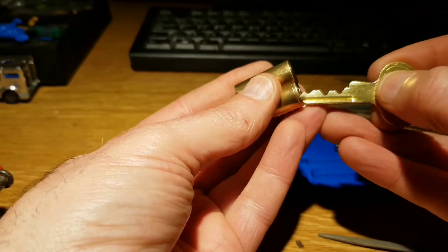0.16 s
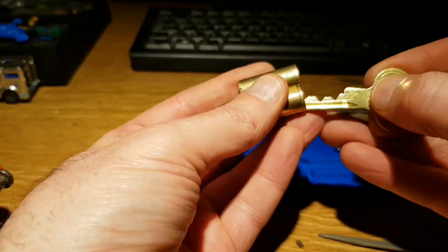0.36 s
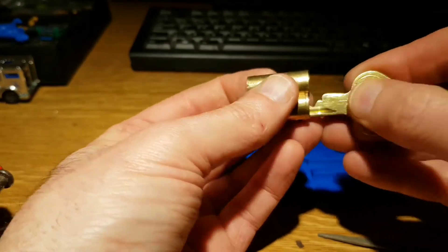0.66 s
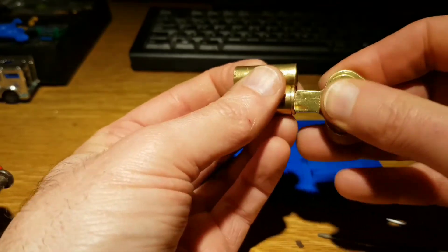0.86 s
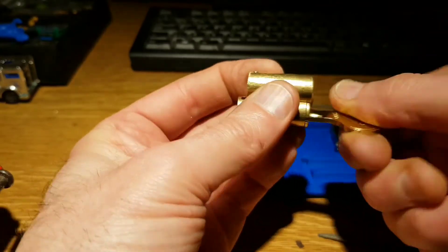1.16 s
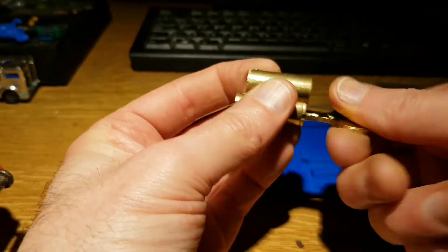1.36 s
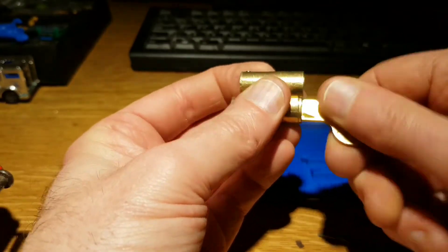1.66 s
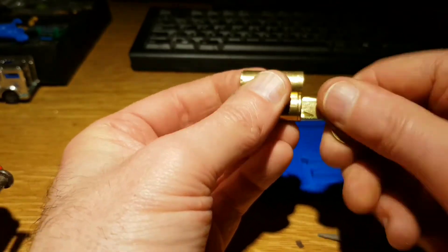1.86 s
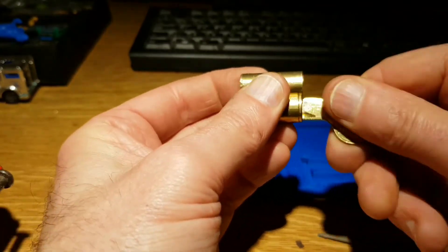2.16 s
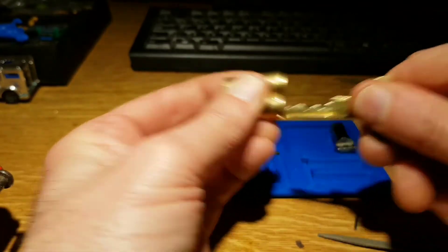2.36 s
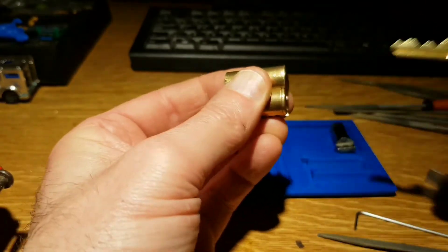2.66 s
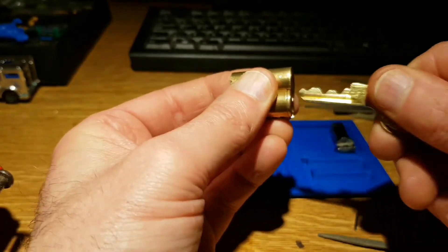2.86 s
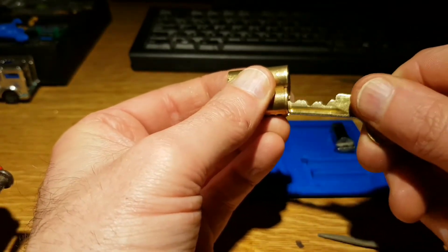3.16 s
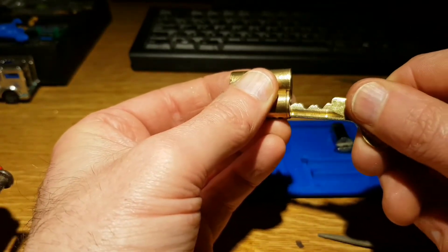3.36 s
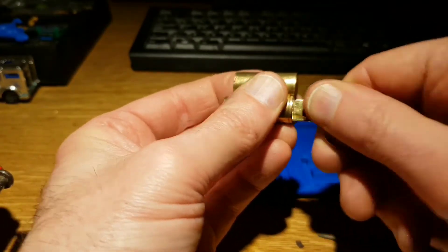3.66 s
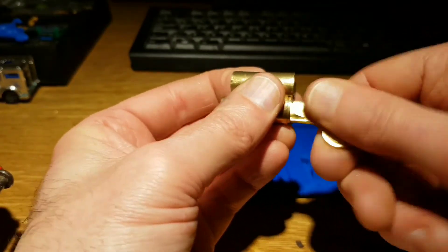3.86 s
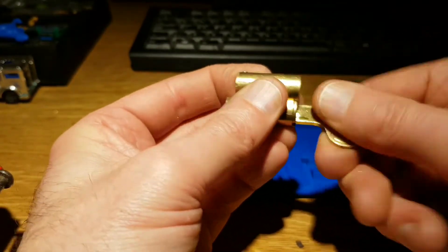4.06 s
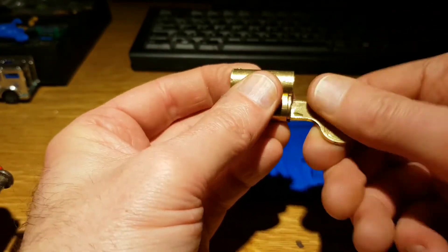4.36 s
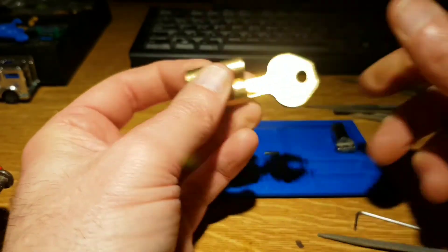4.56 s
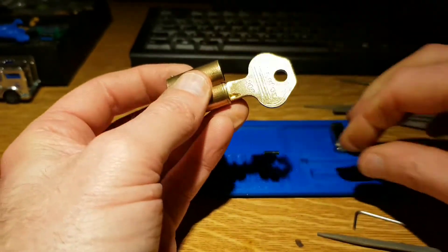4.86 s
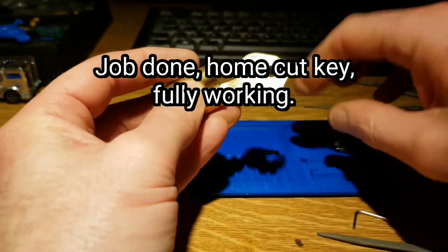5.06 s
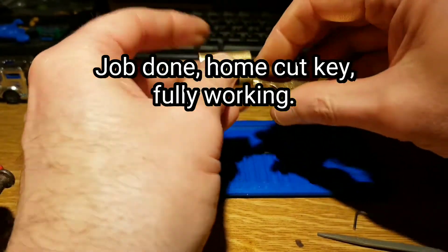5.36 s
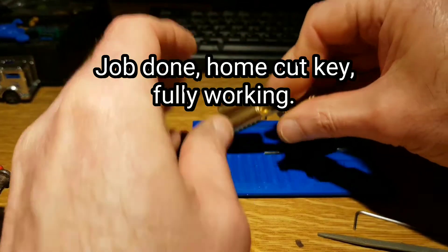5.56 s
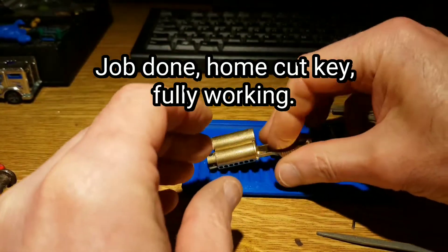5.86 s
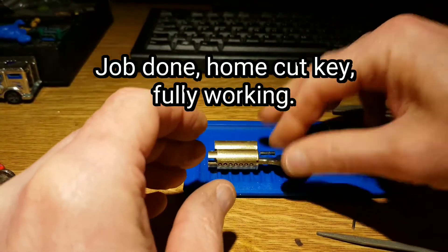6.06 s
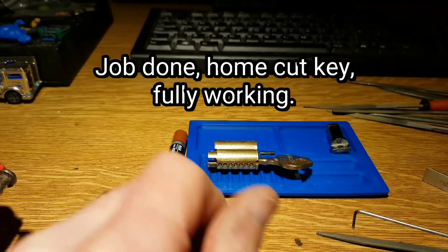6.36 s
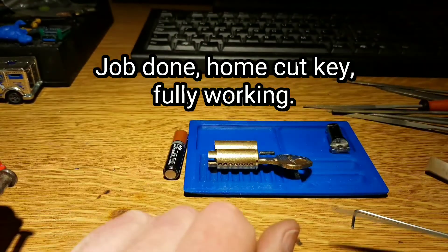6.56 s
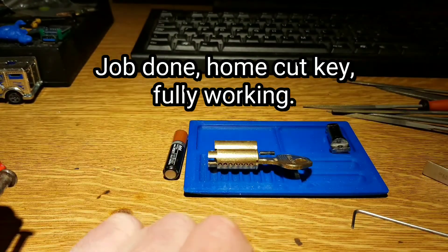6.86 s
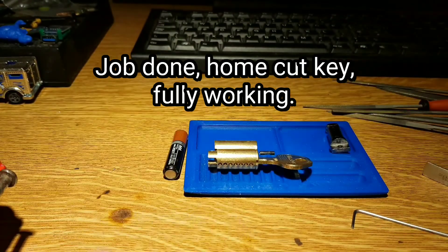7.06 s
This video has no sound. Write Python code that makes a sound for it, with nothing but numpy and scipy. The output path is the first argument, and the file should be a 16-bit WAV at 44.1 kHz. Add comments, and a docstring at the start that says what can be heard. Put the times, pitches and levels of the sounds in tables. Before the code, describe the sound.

Close stereo pickup in a small dry room: a brass key slides into a hand-held lock cylinder with bright snapping clicks and a hard stop. Light ticks follow as it turns, then a rapid clatter as it is pulled out. It goes in and turns again. The lock clacks onto a plastic tray, and metal tools knock and ring briefly on the wooden desk. A soft low hum and faint hiss sit beneath.

```python
"""In a small dry room, heard close by in stereo, a brass key goes into a hand-held lock cylinder, turns,
comes out, goes in and turns again. Sprung pins snap over its cuts: shaped noise bursts that ring brass modes.
The lock is then set on a plastic tray and metal tools clatter on the wooden desk: band-limited bursts over
ringing tool, panel and desk modes. Behind them lie a swelling low hum, the rumble of moving hands, hiss
and faint thin whistles; banded noise tails make the reflections."""
import sys
import numpy as np
from scipy import signal
from scipy.fft import rfft, irfft
from scipy.io import wavfile
from scipy.ndimage import uniform_filter1d

SR = 44100
rng = np.random.default_rng(int(sys.argv[2]) if len(sys.argv) > 2 else 0)


def transcribe(signal):
    """Save signal, clipped to [-1, 1], as a 16-bit WAV file at the path in sys.argv[1]."""
    frames = np.atleast_2d(signal).T
    limited = np.clip(frames, -1, 1)
    pcm = np.round(limited * 32767).astype(np.int16)
    wavfile.write(sys.argv[1], SR, pcm)


N = 317520
T = np.arange(N) / SR  # [s]

# sharp clicks as pins snap over the cuts of the sliding key, and one as the lock lands:
# (time [s], energy [dB], decay [ms], body against snap [dB])
PIN_CLICKS = [ (0.6591, -11.5, 2.2, -32), (0.7585, -9.5, 3.1, -27.5), (0.769, -1, 1.8, -23.5),
              (2.424, -22.5, 5.4, -5.5), (2.429, -15, 1.6, -5), (2.437, -8.5, 6.6, -3.5),
              (2.464, -15, .9, -1), (2.475, -7, 11, -11), (2.4828, -3, 1.6, -26.5), (2.489, -7.5, 2.5, -14),
              (3.6327, -14, 3.3, -14), (3.652, -9.5, 4.5, -22.5), (3.6702, -1, 1.4, -17.5),
              (6.081, -14.5, 6.2, -2.5)]
# the key's shoulder hits the face of the cylinder: (time [s], energy [dB], body against snap [dB])
SHOULDER_STOPS = [(0.8844, 7.5, -16), (3.7737, 8.5, -10.5)]
# light ticks as the key is aimed, turned and let go, and as loose metal settles:
# (time [s], energy [dB], decay [ms], body against snap [dB])
LIGHT_TICKS = [ (.314, -39, 2, -4.5), (0.4196, -29, .7, -11), (0.4708, -24.5, 0.68, -12),
               (1.206, -26, 5.4, -5), (1.4805, -24, 1.4, -25), (1.581, -24.5, 2.5, -4),
               (1.778, -33, 1.3, 2.5), (1.802, -29, 1.7, -1), (1.915, -23, 0.49, -12),
               (1.9896, -19, 2.1, -9.5), (3.171, -49, 2.6, 5), (3.2532, -39.5, 2.1, 1.5),
               (3.308, -34.5, 1.8, -8), (3.3373, -37.5, 1.6, -6), (3.9829, -23.5, 1.43, -5),
               (4.155, -26, 1.05, -11.5), (4.2146, -25.5, 5.6, 0), (4.397, -30.5, 1.07, -2),
               (4.49, -30, 2.8, -4), (4.5962, -23, .7, -11), (4.678, -22, 4.1, -9.5),
               (5.064, -36.5, 1.8, -16), (5.121, -34.5, 3.5, -17), (5.3887, -38.5, .7, -16),
               (5.4565, -36.5, 0.54, -2.5), (5.555, -23, 2.9, -8.5), (5.885, -24, 0.94, 4.5),
               (6.047, -36.5, 2.6, 4), (6.0717, -20, 1, 2.5), (6.16, -17.5, 4, -10), (7.104, -14, 1.1, 2),
               (7.1655, -14.5, 2.6, 2)]
# spans in which ticks ring the key: (start [s], end [s])
KEY_RINGS = [(1.4, 1.6), (4.1, 4.2)]
# spectrum of the bright snap: (frequency [Hz], density [dB per Hz])
SNAP_SPECTRUM = [(200, -49), (1700, -33), (2600, -11.5), (4500, -14), (7500, -9.5), (10000, -2.5),
                 (13700, -2.5), (15400, -1), (17500, -22.5)]
# spectrum of the fuller body under the snap: (frequency [Hz], density [dB per Hz])
BODY_SPECTRUM = [(60, -14), (250, -16), (700, 6), (1100, -6), (2100, 1), (4000, 0), (8000, -1),
                 (15000, -7.5), (18000, -33)]
# modes of the hand-damped brass: (frequency [Hz], energy [dB], t60 [s])
BRASS_MODES = [(2530, -5.5, 0.016), (5520, -8.5, 0.017), (6150, -9, 0.024), (9560, -6, 0.0058),
               (11500, -1.5, 0.027), (13100, -4.5, 0.004), (15800, 0.5, 0.0027), (13900, 0.5, 0.0095)]
# modes of the key: (frequency [Hz], energy [dB], t60 [s])
KEY_MODES = [(4220, 17.5, 0.0082), (5660, -25, 0.035), (9500, 1, 0.016)]
# the fingers shift their grip, the hand meets the desk: (time [s], energy [dB])
GRIP_JOLTS = [(3.685, -17), (4.597, -21), (4.625, -18.5), (5.158, -26), (5.58, -20.5), (5.908, -7.5),
              (6.138, -11)]
# spectrum of a dull push: (frequency [Hz], density [dB per Hz])
JOLT_SPECTRUM = [(30, -12.5), (100, 8), (190, -1.5), (350, -14.5), (800, -23), (2000, -54.5), (8000, -75)]
# the key's tip scrapes at the mouth of the keyway: (time [s], length [s], level [dB])
KEYWAY_SCRAPES = [(3.118, 0.062, -66.5), (3.247, 0.051, -63)]
# modes of the mouth of the keyway: (frequency [Hz], energy [dB], t60 [s])
KEYWAY_MODES = [(2270, -2, .011), (3380, -27, 0.0098)]
# the hand lays the lock on the plastic tray:
# (time [s], energy [dB], decay [ms], lowest frequency [Hz], highest frequency [Hz])
TRAY_LANDING = [(5.886, -9.5, 24, 170, 1140), (6.070, -4, 11, 540, 925), (6.083, 11.5, 4.1, 524, 7960),
                (6.112, -3.5, 12, 460, 1814), (6.163, -10.5, 4.6, 140, 890)]
# loose metal tools knock on the desk:
# (time [s], energy [dB], decay [ms], lowest frequency [Hz], highest frequency [Hz])
TOOL_KNOCKS = [(6.619, -3, 4.7, 669, 1465), (6.6371, 2.5, 2.9, 1800, 6640), (6.666, -2.5, 6.8, 854, 2760),
               (7.006, -10, 10.7, 892, 2600), (7.018, -9, 13, 900, 1890), (7.0588, 1.5, 3.7, 970, 6540),
               (7.1065, 1, 2.9, 580, 1940), (7.128, -6, 2.3, 586, 1580), (7.167, -4.5, 3.2, 710, 2680)]
# spectrum of the clack on tray and desk: (frequency [Hz], density [dB per Hz])
CLACK_SPECTRUM = [(60, -35.5), (300, -9), (560, -0.5), (800, -1), (980, -6), (1300, -5), (1850, -9),
                  (2600, -10.5), (4500, -14), (7500, -21), (15000, -9)]
# modes of the metal that lands: (frequency [Hz], energy [dB], t60 [s])
TOOL_MODES = [(1006, 6, 0.17), (1100, 0, .14), (1280, -8, 0.12), (1490, 1.5, .16), (1680, 1.5, 0.13),
              (2010, -16, 0.037), (2480, -11.5, 0.1), (2610, -13, .08), (3390, -12, 0.037),
              (3190, -15.5, .08), (4250, -3, .06), (7050, -8, .1), (10400, -6.5, .08), (12520, -10.5, .1)]
# modes of a light panel on the desk: (frequency [Hz], energy [dB], t60 [s])
PANEL_MODES = [(463.3, -2, 0.17), (495, -5, 0.059), (588, -7.5, 0.16), (639, -6.5, 0.41), (773, -5, .12),
               (831.4, -3, 0.29)]
# modes of the wooden desk top: (frequency [Hz], energy [dB], t60 [s])
DESK_MODES = [(138.3, 3.5, 0.72), (206, -14.5, .12), (231.6, -2.5, 0.27), (330.3, -1, .45),
              (388, -1.5, 0.073)]
# colour of the reflections: (frequency [Hz], level [dB])
ROOM_COLOUR = [(80, 4.5), (400, 0), (1500, -0.5), (4000, 1.5), (8000, -1), (15000, -5)]
# decay of the reflections: (frequency [Hz], t60 [s])
ROOM_DECAY = [(100, 0.55), (400, .38), (1800, 0.37), (5000, 0.28), (13000, 0.2)]
# rumble of the moving hands: (frequency [Hz], density [dB per Hz])
HANDS_SPECTRUM = [(20, -9), (45, -3.5), (105, -3), (160, -10.5), (270, -16.5), (420, -28.5), (2000, -59.0)]
# steady noise floor: (frequency [Hz], density [dB per Hz])
FLOOR_SPECTRUM = [(15, -34.5), (25, -9), (71, 2.5), (91, 0), (177, -17.5), (265, -16), (357, -33),
                  (578, -37), (1880, -39), (3690, -51), (6480, -51), (7610, -60), (8480, -50),
                  (11100, -43.5), (15300, -42)]
# faint thin whistles that rise and fall: (middle [s], length [s], top pitch [Hz])
THIN_WHISTLES = [(.1, .3, 9100), (2.73, .1, 10800), (2.83, .12, 11200), (2.96, .24, 11100),
                 (5.53, .3, 11800)]

LEAD_S = 0.004  # a burst starts this long before its blow
CLICK_ROOM_DB, STOP_ROOM_DB, TICK_ROOM_DB = -9.5, -7, -3.5  # room send against the direct sound
STOP_DECAY_MS = 1
# the last pins lift just before each stop
RUN_IN_S, RUN_IN_DB, RUN_IN_DECAY_MS, RUN_IN_BODY_DB = 0.0082, -13, 4, -14.5
# a drawn-out tick has a fainter one just before; ticks no longer than CRISP_MS come without
FORE_TICK_S, FORE_TICK_DB, CRISP_MS = 0.0065, -11, 1.1
# small metal parts rattle faintly within this time after a tick
RATTLE_S, RATTLE_DB, RATTLE_DECAY_MS = 0.033, -12.5, 1.1
CLICK_JOLT_DB, STOP_JOLT_DB = 5, -19  # push in the fingers, against a click's body and against a stop
SLIPS_PER_S, SCRAPE_EDGE_S, SCRAPE_ROOM_DB = 630, 0.0093, -1.5
LANDING_METAL_DB, LANDING_ROOM_DB = -16, -7  # the fingers damp the metal
KNOCK_METAL_DB, KNOCK_ROOM_DB = -6.5, -3.5
# desk boom for a blow that reaches down to BOOM_HZ; lighter blows boom less
BOOM_DB, BOOM_HZ, BOOM_DB_PER_OCTAVE = -10, 450, -8
# panel ring for a blow that reaches up to PANEL_HZ; harder blows ring it less
PANEL_DB, PANEL_HZ, PANEL_DB_PER_OCTAVE = -8, 1540, -1
TIP_S, TIP_HZ, TIP_SWELL_MS, TIP_DB = 6.619, 877, 4.3, -5.5
# the waver depths multiply a slow random drift
HUM_HZ, HUM_WANDER_HZ, HUM_DB, HUM_WAVER_DB = 63.3, 2.2, -59.5, 5
# the hum swells by this much, holds and sinks back
HUM_SWELL_DB, HUM_SWELL_S, HUM_RISE_S, HUM_FADE_S, HUM_FALL_S = 9, 0.5, 1.5, 4.47, 0.12
HANDS_DB, HANDS_WAVER_DB = -61, 4.5
FLOOR_DB = -57
WHISTLE_DB, WHISTLE_SAG = -76, 0.092  # level in the middle; share of the pitch lost at either end
TOP_HZ = 15200


def undb(db):
    """Decibels to gain."""
    return 10 ** (np.asarray(db) / 20)


def unit(x):
    """Scale to an energy of one: summed over time, averaged over channels."""
    return x / np.sqrt(np.mean(np.sum(x ** 2, axis=-1)))


def on_log(points, hz):
    """Read (frequency [Hz], value) points on a log-frequency axis."""
    f, value = np.transpose(points)
    return np.interp(np.log(hz + 1), np.log(f), value)


def response(points, size=4096):
    """Causal impulse response of a spectrum: fold its cepstrum so the energy comes as early as it can."""
    magnitude = undb(on_log(points, np.fft.rfftfreq(size, 1 / SR)))
    cepstrum = irfft(np.log(magnitude))
    cepstrum[1:size // 2] *= 2
    cepstrum[size // 2 + 1:] = 0
    return unit(irfft(np.exp(rfft(cepstrum))))


def through(x, ir):
    """Convolve with a response."""
    return signal.fftconvolve(np.atleast_2d(x), np.atleast_2d(ir), axes=1)[:, :N]


def stereo_noise(size, likeness):
    """Two noises with a shared part."""
    c = np.clip(likeness, 0, 1)
    shared = rng.standard_normal(size)
    return np.sqrt(c) * shared + np.sqrt(1 - c) * rng.standard_normal((2, size))


def drift(rate):
    """Slow random wander about zero, smoothed from this many random steps per second."""
    k = int(SR / rate)
    steps = np.repeat(rng.standard_normal(N // k + 1), k)[:N]
    return 0.6 * uniform_filter1d(uniform_filter1d(steps, k), k)


def add(track, s, sound):
    """Mix a sound in at a time."""
    i = int(s * SR)
    track[:, i:i + sound.shape[-1]] += sound[..., :N - i]


def pan(x, db):
    """Lean a sound to the left by this level difference."""
    return x * undb(np.array([[db], [-db]]) / 2)


def ringing(modes, spread, strike_db, size):
    """Decaying modes: each blow weights and detunes them, and each has its own phase left and right."""
    hz, db, t60 = np.transpose(modes)[:, :, None]
    chance = rng.standard_normal((len(modes), 4)).T[:, :, None]
    t = T[:size]
    turn = 2 * np.pi * hz * (1 + 0.0054 * chance[3]) * t
    # dividing by the root of t60 makes the level an energy
    envelope = undb(db + strike_db * chance[2]) * np.exp(-np.log(1000) * t / t60) / np.sqrt(t60)
    return unit(np.sum(envelope * np.sin(turn + spread * chance[:2]), axis=1))


def contact(rise_ms, decay_ms, likeness, scatter_db, size=2048):
    """A noise burst rises to the blow and trails off in reflections from hands and desk."""
    ms = 1000 * (T[:size] - LEAD_S)
    after = np.maximum(ms, 0)
    rise = np.exp(np.minimum(ms, 0) / rise_ms)
    envelope = rise * (np.exp(-after / decay_ms) + undb(scatter_db) * np.exp(-after / 3.5))
    burst = rfft(stereo_noise(size, likeness) * envelope)
    # even out the burst's spectrum so that every blow keeps its set colour
    power = uniform_filter1d(np.abs(burst) ** 2, int(40 / decay_ms) + 6)
    return unit(irfft(burst / np.sqrt(power)) * np.minimum(1, 20 * envelope))


def contacts():
    """List metal contacts as (s, dB, decay ms, body dB, room dB), with run-ins, fore-ticks and rattle."""
    rows = [(*click, CLICK_ROOM_DB) for click in PIN_CLICKS]
    for s, db, body_db in SHOULDER_STOPS:
        rows.append((s - RUN_IN_S, db + RUN_IN_DB, RUN_IN_DECAY_MS, RUN_IN_BODY_DB, STOP_ROOM_DB))
        rows.append((s, db, STOP_DECAY_MS, body_db, STOP_ROOM_DB))
    for s, db, decay_ms, body_db in LIGHT_TICKS:
        rows.append((s, db, decay_ms, body_db, TICK_ROOM_DB))
        if decay_ms > CRISP_MS:
            rows.append((s - FORE_TICK_S, db + FORE_TICK_DB, decay_ms, body_db, TICK_ROOM_DB))
        for delay in RATTLE_S * rng.random(size=2):
            rows.append((s + delay, db + RATTLE_DB, RATTLE_DECAY_MS, body_db, TICK_ROOM_DB))
    return rows


def lock():
    """Metal contacts strike the hand-damped brass and ring its modes; returns direct sound and room send."""
    body = response(BODY_SPECTRUM)
    snap_hz, snap_db = np.transpose(SNAP_SPECTRUM)
    near, far = np.zeros((2, 2, N))
    for s, db, decay_ms, body_db, room_db in contacts():
        burst = contact(0.6 * decay_ms, decay_ms, likeness=0.3, scatter_db=-24)
        # every pin and every grip colours the snap a little differently
        grip_db = 1.7 * rng.standard_normal(len(snap_db))
        snap = response(np.column_stack([snap_hz, snap_db + grip_db]))
        click = unit(through(burst, snap)) + undb(body_db) * unit(through(burst, body))
        brass = ringing(BRASS_MODES, spread=1.0, strike_db=1.2, size=4096)
        click = click + undb(-9.5) * unit(through(burst, brass))
        if any(start < s < end for start, end in KEY_RINGS):
            key = ringing(KEY_MODES, spread=2, strike_db=2, size=4096)
            click = click + undb(-11) * unit(through(burst, key))
        add(near, s - LEAD_S, undb(db) * click)
        add(far, s - LEAD_S, undb(db + room_db) * click)
    return pan(near, 0.9), pan(far, 1)


def jolts():
    """Dull low pushes of the cylinder against the fingers at sharp clicks, stops and changes of grip."""
    out = np.zeros((2, N))
    push = response(JOLT_SPECTRUM)
    clicks = [(s, db + body_db + CLICK_JOLT_DB) for s, db, _, body_db in PIN_CLICKS]
    stops = [(s, db + STOP_JOLT_DB) for s, db, _ in SHOULDER_STOPS]
    for s, db in clicks + stops + list(GRIP_JOLTS):
        add(out, s, undb(db) * push)
    return pan(out, 3.6)


def scrape():
    """The key's tip catches and slips on the brass; the tiny slips ring the mouth of the keyway."""
    slips = rng.standard_normal(N) * (rng.random(N) < SLIPS_PER_S / SR)
    pressure = np.zeros(N)
    for s, length, db in KEYWAY_SCRAPES:
        pressure += undb(db) * np.clip(np.minimum(T - s, s + length - T) / SCRAPE_EDGE_S, 0, 1)
    mouth = ringing(KEYWAY_MODES, spread=0.91, strike_db=0.93, size=2048)
    return through(pressure * slips / np.std(slips), mouth)


def desk():
    """Each blow clacks, booms in the desk top and rings a light panel and the metal that lands."""
    clacks, booms, far = np.zeros((3, 2, N))
    clack_colour = response(CLACK_SPECTRUM)
    blows = [(*row, LANDING_METAL_DB, LANDING_ROOM_DB) for row in TRAY_LANDING]
    blows += [(*row, KNOCK_METAL_DB, KNOCK_ROOM_DB) for row in TOOL_KNOCKS]
    for s, db, decay_ms, low_hz, high_hz, metal_db, room_db in blows:
        boom_db = BOOM_DB + BOOM_DB_PER_OCTAVE * np.log2(low_hz / BOOM_HZ)
        panel_db = PANEL_DB + PANEL_DB_PER_OCTAVE * np.log2(high_hz / PANEL_HZ)

        # a light object drives little bass, a soft contact little treble
        edges = [low_hz, np.clip(high_hz, 1.2 * low_hz, SR / 3)]
        band = signal.butter(2, edges, "band", fs=SR, output="sos")
        burst = through(contact(0.93, decay_ms, likeness=0.06, scatter_db=-16), clack_colour)
        clack = undb(db) * unit(signal.sosfilt(band, burst))

        soft = signal.butter(1, min(high_hz, SR / 3), fs=SR, output="sos")
        metal = signal.sosfilt(soft, ringing(TOOL_MODES, spread=1.78, strike_db=1.5, size=16384))
        panel = ringing(PANEL_MODES, spread=0.67, strike_db=2.1, size=16384)
        ring = undb(db + metal_db) * unit(metal) + undb(db + panel_db) * panel
        for track, share_db in (clacks, 0), (far, room_db):
            add(track, s - LEAD_S, undb(share_db) * clack)
            add(track, s, undb(share_db) * ring)

        # a light object reaches only the upper modes of the desk top
        light = signal.butter(2, low_hz / 2, "high", fs=SR, output="sos")
        boom = signal.sosfilt(light, ringing(DESK_MODES, spread=0.3, strike_db=1.5, size=16384))
        add(booms, s, undb(db + boom_db) * unit(boom))
    return pan(clacks, 5.5), pan(booms, 1.3), pan(far, 1.8)


def tipping_tool():
    """A tool tips over and hums for a moment: one sine that swells and fades within milliseconds."""
    out = np.zeros((2, N))
    t = T[:2048]
    age = 1000 * t / TIP_SWELL_MS
    tone = age * np.exp(-age) * np.sin(2 * np.pi * TIP_HZ * t)
    add(out, TIP_S, undb(TIP_DB) * unit(tone))
    return pan(out, 16.5)


def room(x):
    """Dense reflections build up within milliseconds; the treble dies sooner, the bass is alike left and right."""
    t = T[:SR * 2 // 3]
    hz = np.fft.rfftfreq(len(t), 1 / SR)
    centres = np.geomspace(100, 16000, num=8)
    tail = 0
    for centre, share in zip(centres, np.eye(len(centres))):
        noise = rfft(stereo_noise(len(t), 1 / (1 + (centre / 600) ** 2)))
        # neighbouring bands cross over so that their powers add up evenly
        weight = np.sqrt(np.interp(np.log(hz + 1), np.log(centres), share))
        band = irfft(noise * weight, len(t))
        decay = np.exp(-np.log(1000) * t / on_log(ROOM_DECAY, centre))
        envelope = decay * (1 - np.exp(-(t / 0.0051) ** 2))
        tail = tail + undb(on_log(ROOM_COLOUR, centre)) * band * unit(envelope)
    return through(x, tail)


def hum():
    """A low sine that wavers in pitch and level, swells, holds and sinks back."""
    rise = (T - HUM_SWELL_S) / HUM_RISE_S
    fall = 1 - (T - HUM_FADE_S) / HUM_FALL_S
    swell = np.clip(np.minimum(rise, fall), 0, 1)
    phase = 2 * np.pi * np.cumsum(HUM_HZ + HUM_WANDER_HZ * drift(11)) / SR
    level_db = HUM_DB + HUM_SWELL_DB * swell + HUM_WAVER_DB * drift(7)
    return undb(level_db) * np.sqrt(2) * np.sin(phase)


def hands():
    """Rumble of the moving hands: low noise, mostly alike left and right, that wavers in level."""
    rumble = through(stereo_noise(N, likeness=0.89), response(HANDS_SPECTRUM))
    return rumble * undb(HANDS_DB + HANDS_WAVER_DB * drift(14))


def hiss():
    """Steady noise: the long waves reach both microphones alike, the hiss is their own."""
    low = signal.butter(2, 500, fs=SR, output="sos")
    high = signal.butter(2, 500, "high", fs=SR, output="sos")
    bass = signal.sosfilt(low, stereo_noise(N, likeness=0.92))
    treble = signal.sosfilt(high, rng.standard_normal((2, N)))
    air = bass + undb(8.5) * treble
    return pan(undb(FLOOR_DB) * through(air, response(FLOOR_SPECTRUM)), 0.57)


def whistles():
    """Each sine climbs to its top pitch and sinks again, loudest in the middle."""
    out = np.zeros(N)
    for s, length, hz in THIN_WHISTLES:
        off_top = np.minimum((2 * (T - s) / length) ** 2, 1)
        pitch = hz * (1 - WHISTLE_SAG * off_top + 0.0037 * drift(140))
        out += np.sqrt(1 - off_top) * np.sin(2 * np.pi * np.cumsum(pitch) / SR)
    return undb(WHISTLE_DB) * out


def scene():
    """Lock and desk close by, their reflections, and the background."""
    clicks, clicks_far = lock()
    clacks, booms, clacks_far = desk()
    thuds = jolts() + booms
    scraping = scrape()
    room_send = clicks_far + clacks_far + undb(-5.5) * thuds + undb(SCRAPE_ROOM_DB) * scraping
    close = clicks + scraping + thuds + undb(-1) * clacks + tipping_tool()
    background = pan(hum() + hands(), 1.4) + hiss() + whistles()
    return close + room(room_send) + background


def record(dry):
    """Stop the peaks at full scale, then cut the top steeply."""
    steep = signal.ellip(8, 0.2, 60, TOP_HZ, fs=SR, output="sos")
    return signal.sosfilt(steep, np.clip(dry, -1, 1))


dry = scene()
out = record(dry)
transcribe(out)
```